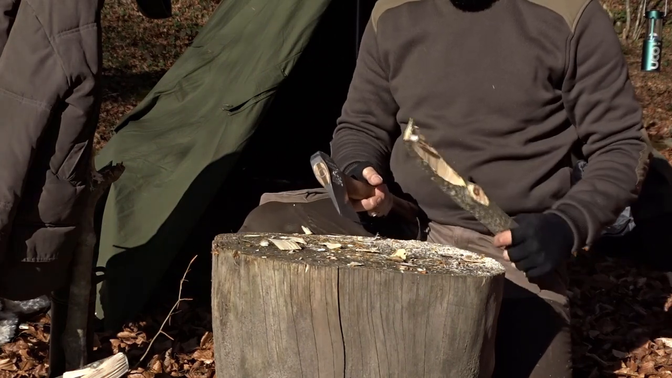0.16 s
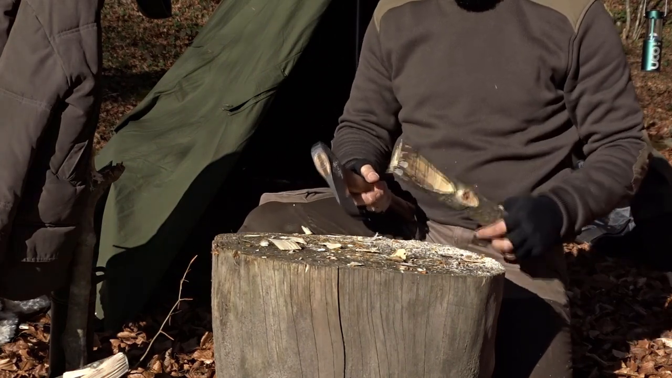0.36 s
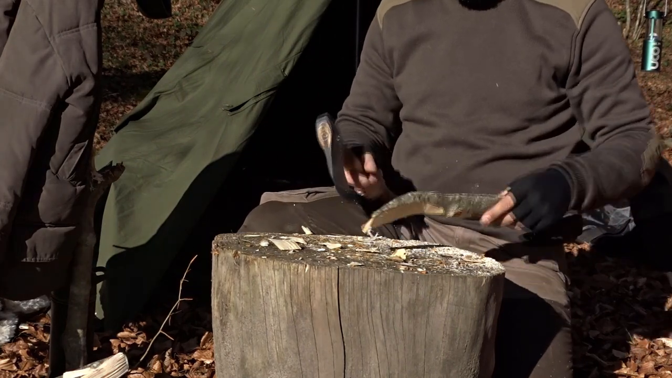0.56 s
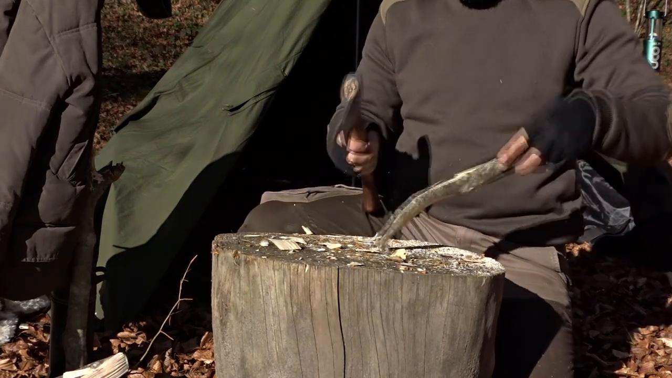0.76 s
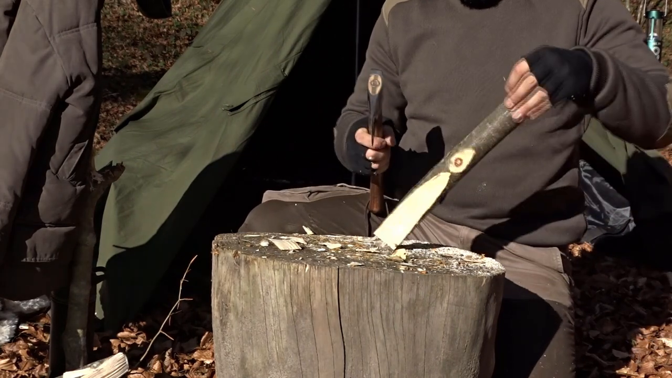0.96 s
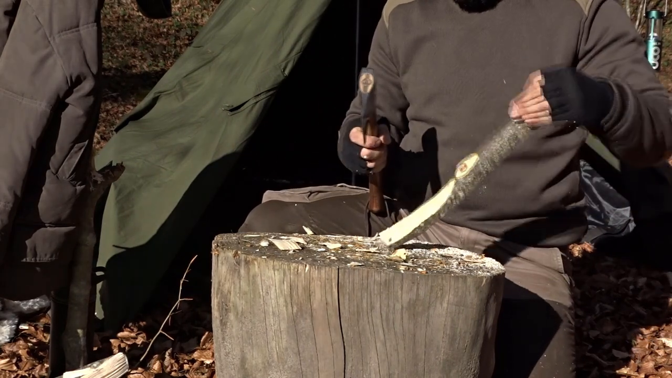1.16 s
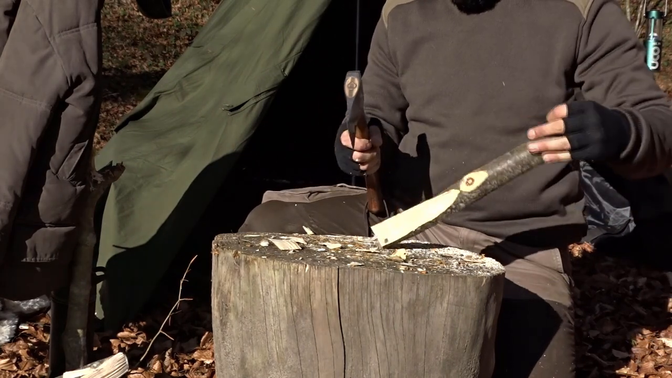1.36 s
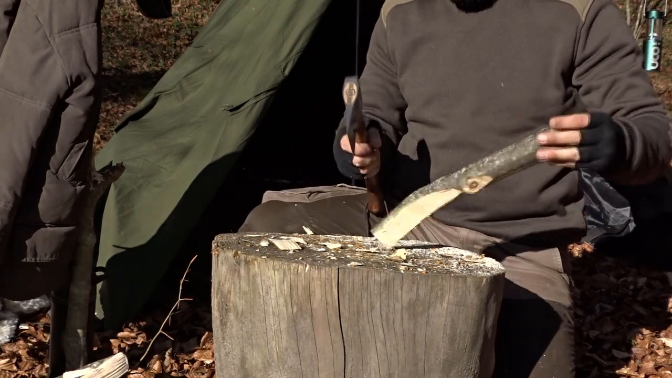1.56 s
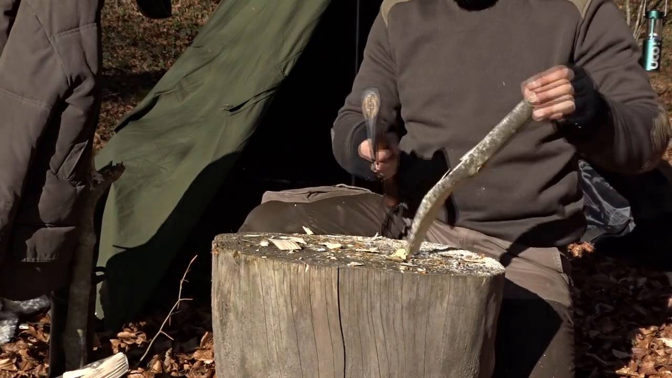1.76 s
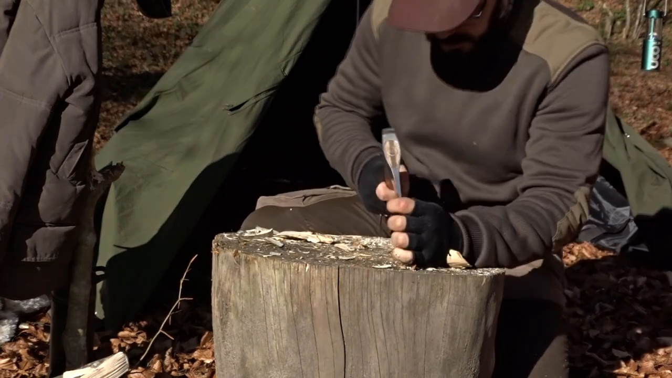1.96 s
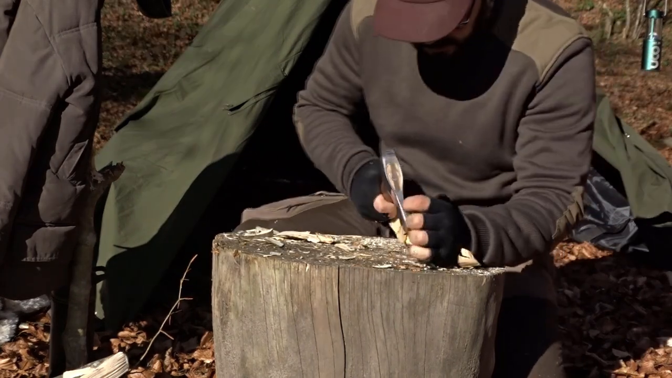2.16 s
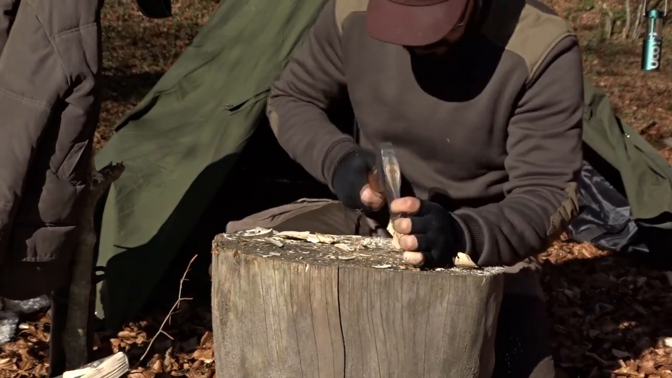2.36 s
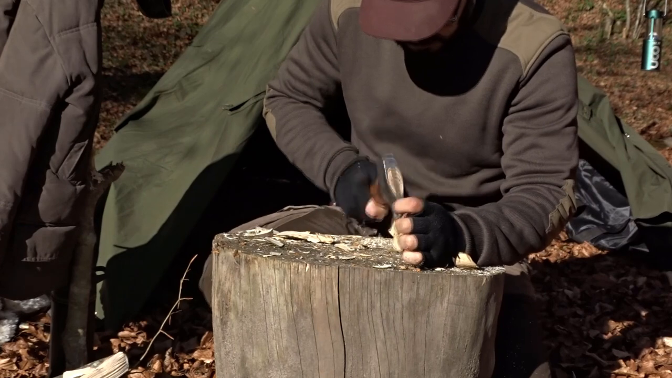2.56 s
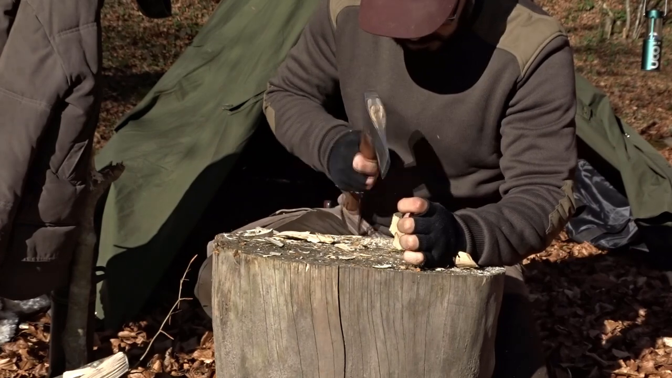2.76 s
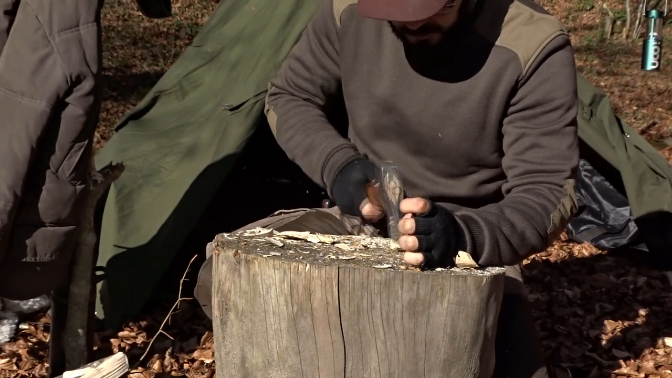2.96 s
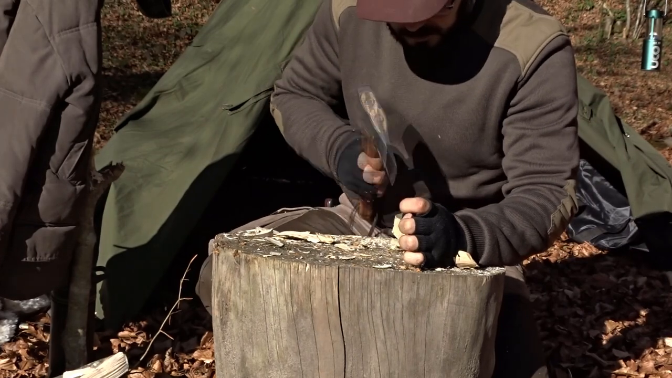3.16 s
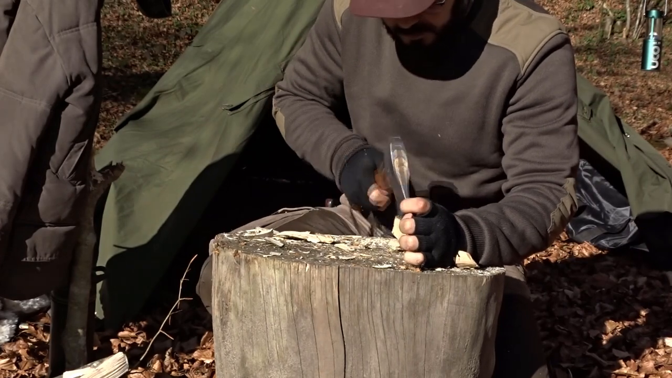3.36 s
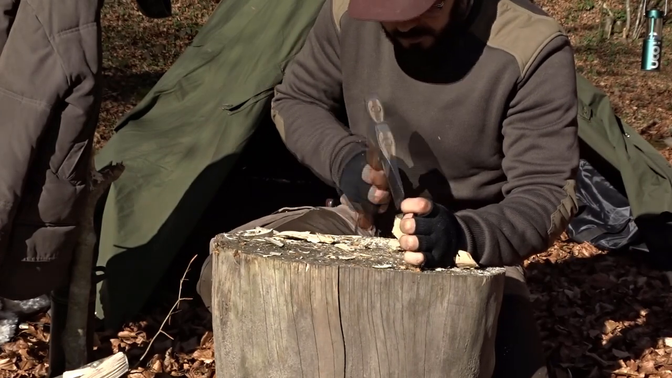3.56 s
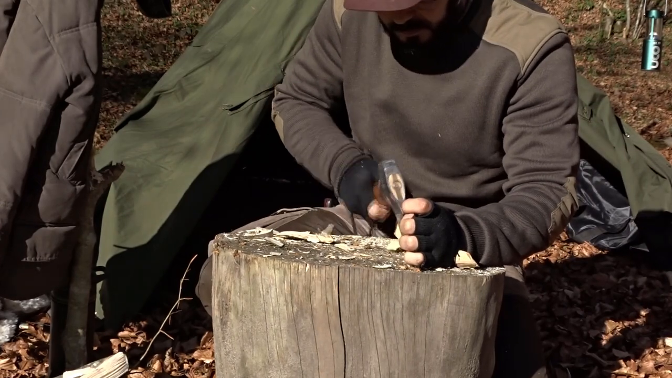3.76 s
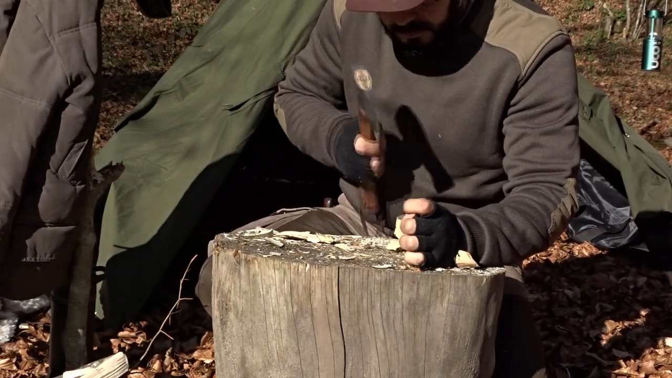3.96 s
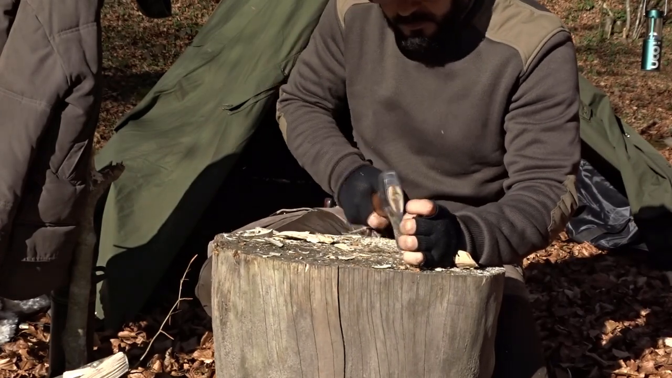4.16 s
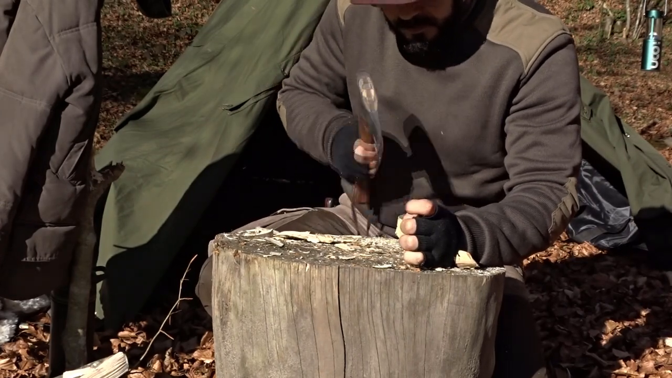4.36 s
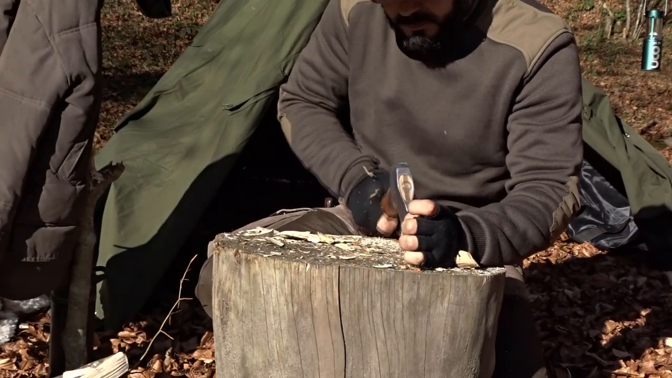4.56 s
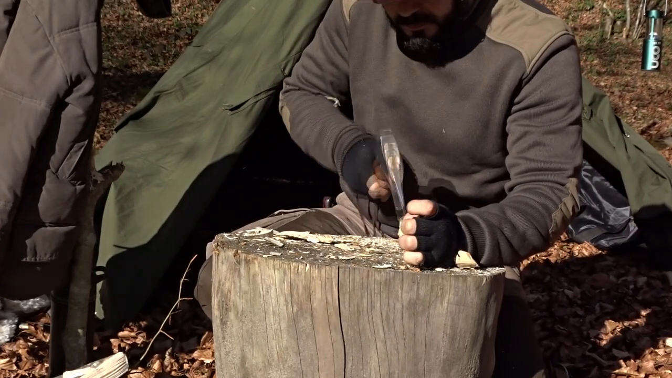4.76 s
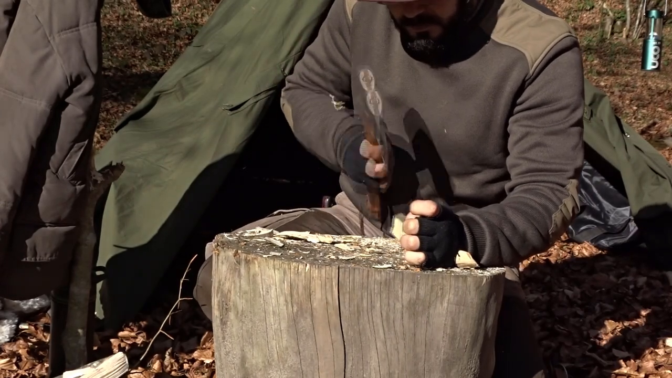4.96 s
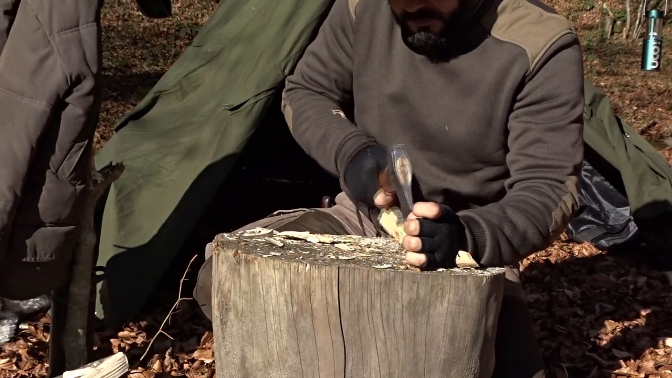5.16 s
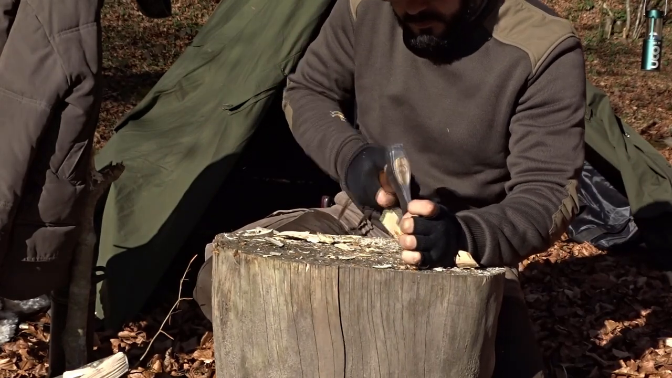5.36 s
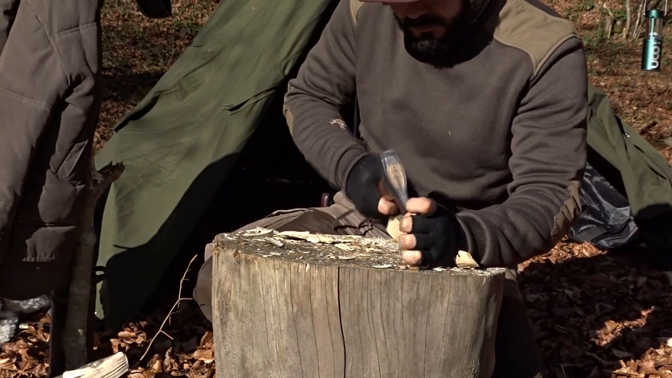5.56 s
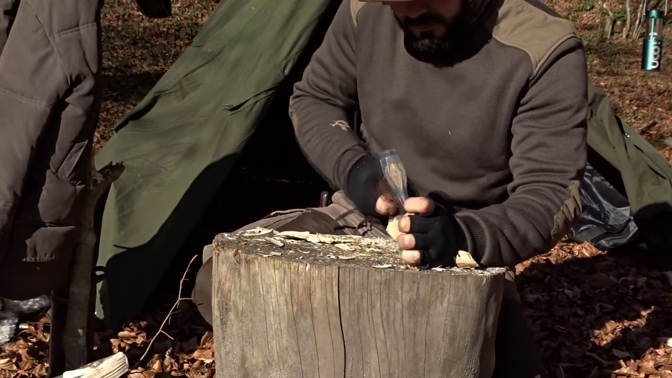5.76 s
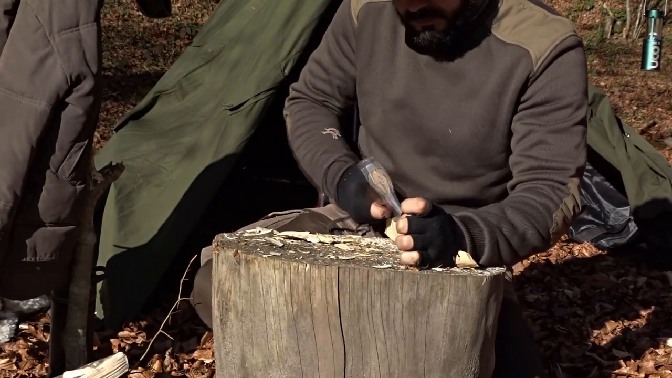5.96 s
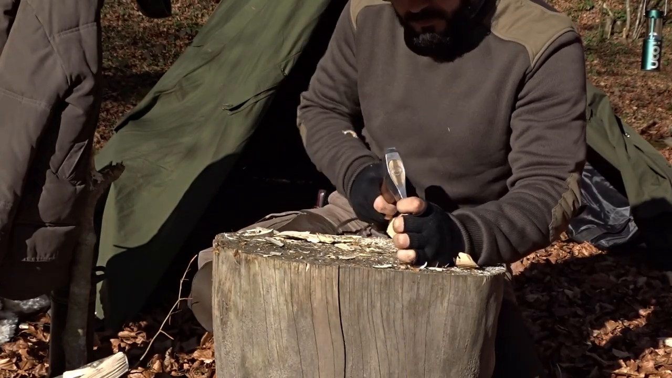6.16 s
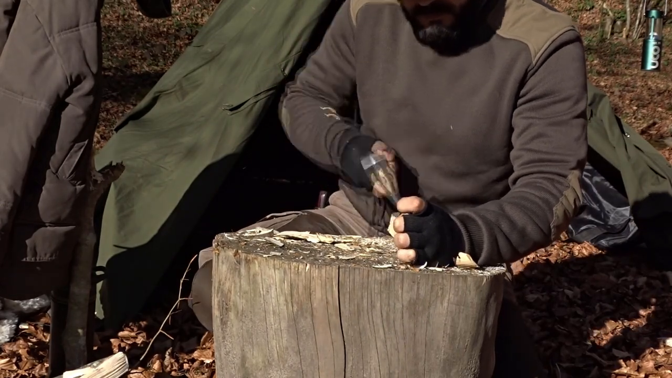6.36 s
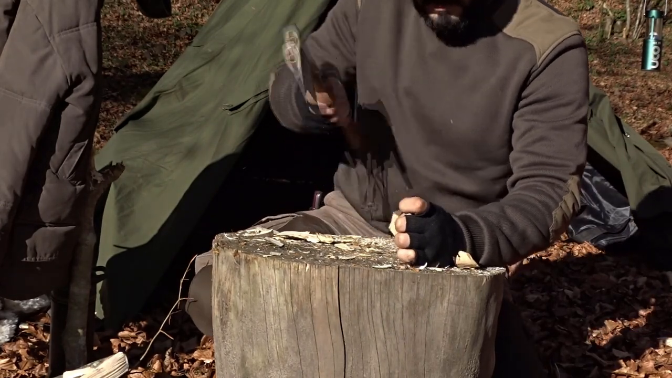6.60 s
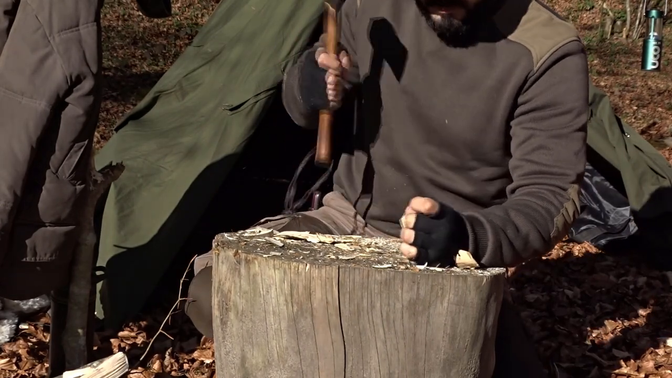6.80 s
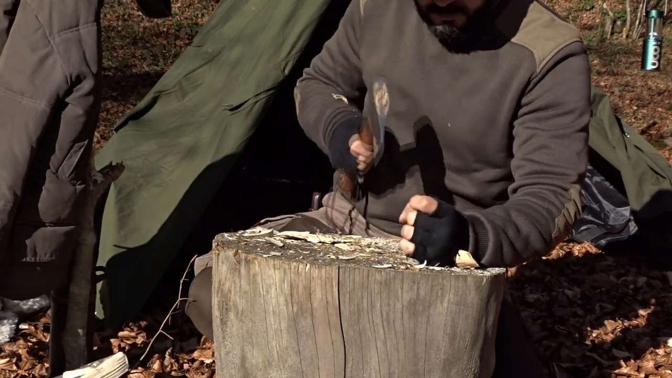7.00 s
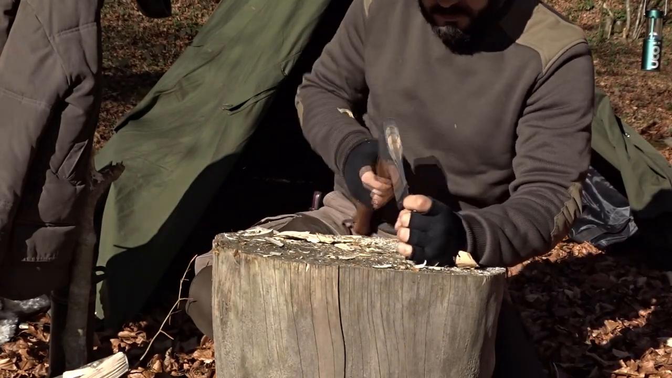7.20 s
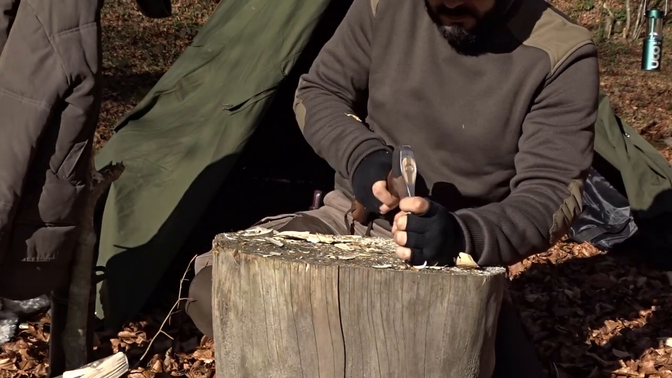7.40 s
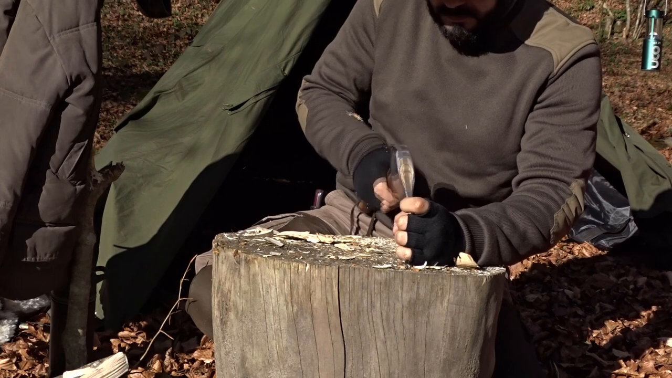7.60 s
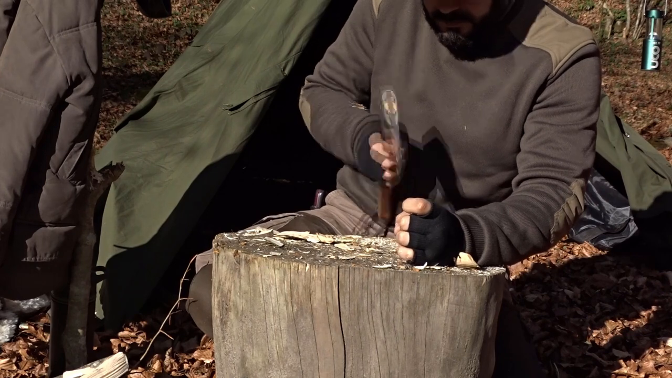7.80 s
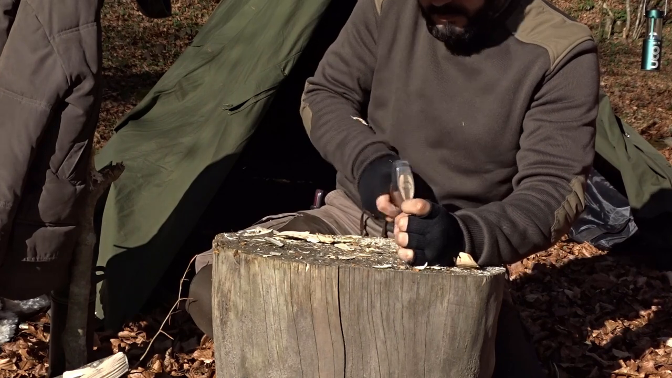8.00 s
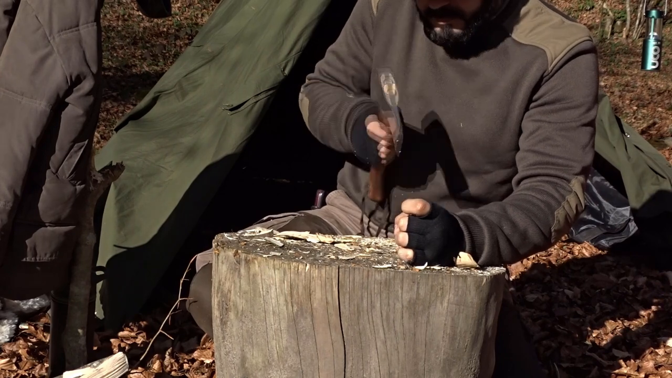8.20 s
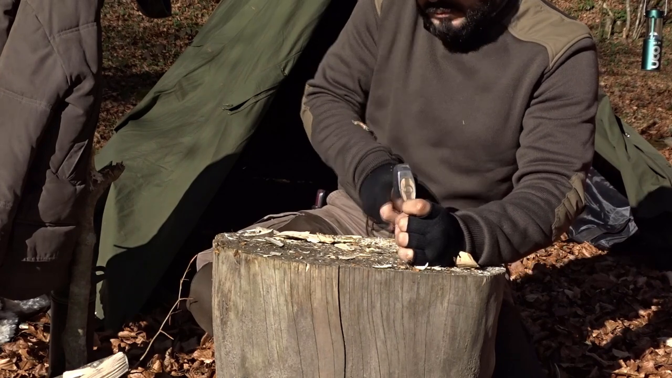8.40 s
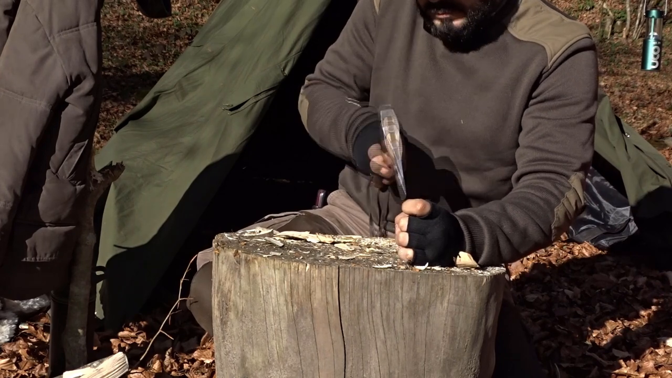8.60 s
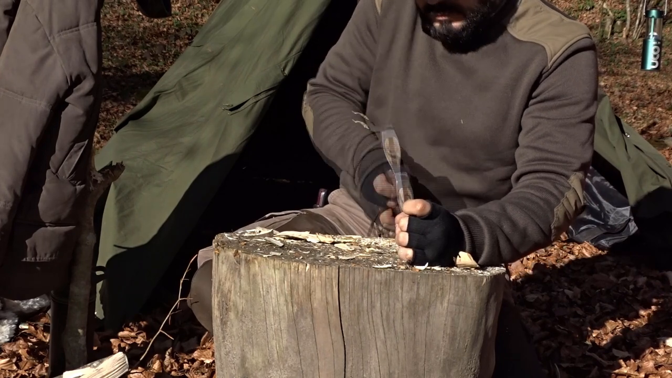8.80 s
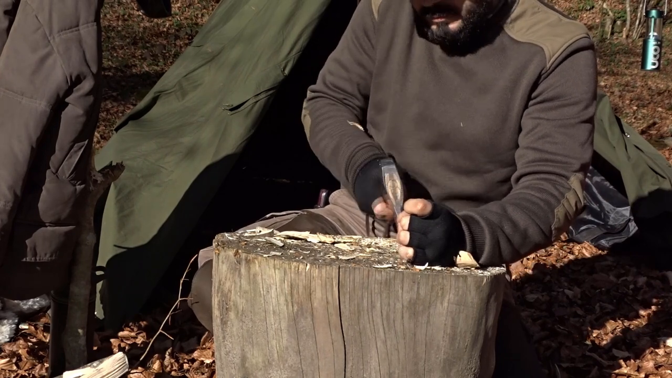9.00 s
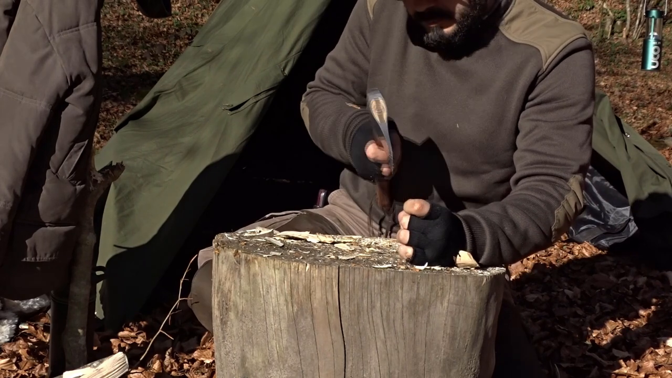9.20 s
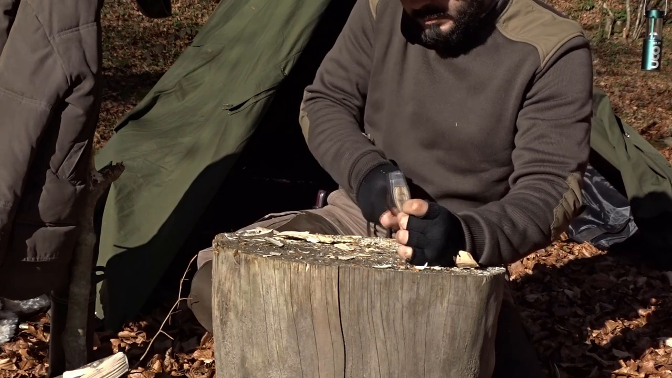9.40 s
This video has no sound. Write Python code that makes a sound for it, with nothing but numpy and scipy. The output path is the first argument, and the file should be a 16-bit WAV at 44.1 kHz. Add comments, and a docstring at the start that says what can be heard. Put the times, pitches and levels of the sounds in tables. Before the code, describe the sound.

In quiet open woodland, a hatchet chops a stick against a stump a few metres from the microphone. After leaf ticks and faint hoarse bird chatter, two weaker taps lead into five sharp, woody cracks about half a second apart. A pause brings dry rustling, then four more blows follow. Each has a short low thud, a light splinter patter and faint tree echoes over steady distant traffic.

```python
"""A hatchet chops a stick held on a tree stump in a wood, a few metres from the microphone.
Each blow is a few jolts of ringing wood, cracking noise and a steel tinge as the blade bites, splits
fibres and drives the stick onto the stump. A low ring of ground modes thuds just after, splinters patter
and the trees echo. Dry leaves tick in bursts of noise, birds call in hoarse bands and wavering sines,
a far engine drones as narrow noise and distant traffic roars steadily as shaped noise."""
import sys
import numpy as np
from scipy import signal
from scipy.fft import rfft, irfft, next_fast_len
from scipy.io import wavfile
from scipy.ndimage import uniform_filter1d

SR = 44100
rng = np.random.default_rng(int(sys.argv[2]) if len(sys.argv) > 2 else 0)


def generate_wav(signal):
    """Clip the signal to [-1, 1] and save it as 16-bit WAV at the path in sys.argv[1]."""
    frames = np.transpose(np.atleast_2d(signal))
    scaled = np.clip(frames, -1, 1) * 32767
    pcm = np.round(scaled).astype(np.int16)
    wavfile.write(sys.argv[1], SR, pcm)


N = 416744  # length in samples

# Blows of the hatchet; echo_db tells how squarely the cut faces the trees
# [start_s, thud_peak_db, splinter_db, echo_db, upper_thud_modes_db]
CHOP_BLOWS = [(2.648, -48, -63, 4, -1), (2.9598, -39, -60, 0, -8), (3.3019, -32.5, -60, 0.5, 0),
              (3.689, -33.5, -63, 0.5, -3), (4.144, -32.5, -61, 2, -4.5), (4.597, -34.5, -56, 1.5, -7),
              (5.102, -28.5, -56, -1.5, -1), (7.961, -34.5, -54.5, -1, -4), (8.4306, -38.5, -56, 5, -11),
              (8.904, -30, -60, -0.5, -2.5), (9.385, -32.5, -66, 3.5, -6)]


def undb(db):
    """Turn dB into gain."""
    return 10 ** (np.asarray(db) / 20)


def unit(x):
    """Scale to rms 1."""
    return x / np.sqrt(np.mean(x ** 2))


def band(x, lo_hz, hi_hz, order=2):
    """Band-pass, with the upper edge kept below the limit of the sample rate."""
    edges_hz = [lo_hz, min(hi_hz, 0.45 * SR)]
    return signal.sosfilt(signal.butter(order, edges_hz, "bandpass", fs=SR, output="sos"), x)


def low(x, edge_hz):
    """Low-pass."""
    return signal.sosfilt(signal.butter(2, edge_hz, fs=SR, output="sos"), x)


def add(out, start_s, x):
    """Mix x in from start_s, cut at the end of the scene."""
    i = int(start_s * SR)
    out[i:i + len(x)] += x[:N - i]


def decay(t, t60_s):
    """Exponential fade that falls 60 dB in t60_s."""
    return np.exp(-np.log(1000) * t / t60_s)


def walk(rate_hz):
    """Slow random levels: steps held for 1 / rate_hz, then slewed twice."""
    hold = int(SR / rate_hz)
    steps = np.repeat(rng.standard_normal(N // hold + 1), hold)
    return 1.05 * uniform_filter1d(uniform_filter1d(steps, hold), hold)[:N]


def near(x):
    """Small wood radiates little bass, and the microphone rolls off steeply on top."""
    x = signal.sosfilt(signal.butter(3, 237, "highpass", fs=SR, output="sos"), x)
    return signal.sosfilt(signal.butter(5, 9280, fs=SR, output="sos"), x)


def ring(force, modes, extra_db=0, scatter_db=1.0, detune=0.044):
    """A force rings a set of modes, a little differently each time; neighbours swing in opposite sense."""
    hz, db, t60_s = np.transpose(modes)[:, :, None]
    pitch_luck, level_luck = rng.standard_normal((2, len(modes), 1))
    t = np.arange(len(force)) / SR
    tones = np.sin(2 * np.pi * hz * (1 + detune * pitch_luck) * t) * decay(t, t60_s)
    sense = (-1) ** np.arange(len(modes))[:, None]
    gain = sense * undb(db + extra_db + scatter_db * level_luck)
    return signal.fftconvolve(force, np.sum(gain * tones, 0))[:len(force)]


def struck(force, modes, favoured_hz, favour_db):
    """Modes near the favoured pitch ring loudest; one an octave away changes by favour_db."""
    octaves_off = np.log2(np.array(modes)[:, :1] / favoured_hz)
    return ring(force, modes, favour_db * octaves_off ** 2, 1.0, detune=0.012)


def hatchet():
    """Each jolt is a quick push, then fibres tear while the blade stays in contact and the wood rings."""
    # Modes of the stick, the stump, the bright wooden knock and the hatchet head's steel
    # [pitch_hz, level_db, t60_s]
    stick_modes = [(618, 5.2, 0.015), (770, 7.9, 0.017), (861, 9.6, 0.014), (930, 2.74, 0.029),
                   (1063, 3.2, 0.019), (1274, 1, 0.01), (1440, 6.2, 0.015), (1750, 4, 0.017)]
    stump_modes = [(205, -14, 0.089), (281.4, -3, 0.26), (350, 0.5, 0.023), (413.6, -2, 0.065),
                   (468, 1.5, 0.034), (505, 9.5, 0.014), (586, -4, 0.035)]
    knock_modes = [(1710, 5.5, 0.0098), (2170, 6, 0.0067), (2460, 8.5, 0.0052), (2720, 4, 0.0065),
                   (3140, 1.5, 0.0034), (3600, -0.5, 0.012), (3880, 2.5, 0.0041), (4840, 5.5, 0.011),
                   (4930, 5.5, 0.0059), (6140, -2, 0.0052)]
    steel_modes = [(3220, 42, 0.015), (4600, -19, 0.078), (5840, -2, 0.074), (7360, -9, 0.032),
                   (8570, -40, 0.064)]
    # Jolts, two to four to a blow (bite, split, seat), and last a lone bounce of the stick.
    # Stump, knock and crack levels are relative to the stick; pitches are those the place struck favours;
    # grip is how soon hand and stump choke the stick once the blade stops
    # [start_s, contact_ms, stick_db, stick_hz, stump_db, knock_db, crack_db, stump_hz, knock_hz, grip_ms]
    jolts = [(2.6499, 1.6, -43, 770, 1, 9, 10, 416, 5500, 5),
             (2.6503, 4.4, -31.5, 766, 4, -4, 2, 540, 3650, 5),
             (2.6567, 3.8, -30, 730, -6, -4, -20, 340, 2670, 5),
             (2.9598, 1.7, -31, 750, -2, 1, -12, 440, 3060, 4.3),
             (2.962, 6.8, -23, 760, 0.5, -5.5, -16, 586, 2800, 5.7),
             (2.969, 4.2, -26.5, 1040, 3, -4, -6, 442, 2470, 5),
             (3.3054, 2.8, -22, 830, -2.5, -8, -8.5, 570, 4670, 4.2),
             (3.309, 4.2, -24, 1410, 2, -4, -25, 396, 2400, 5.6),
             (3.689, 2.45, -11, 828, -8.5, -6.5, -26, 540, 1800, 6),
             (3.6921, 1.6, -16, 890, -21, 1, -12.5, 520, 3000, 5.2),
             (3.6948, 1.5, -16.5, 1200, -5, -0.5, -32, 340, 1900, 3.4),
             (4.1458, 1.9, -10.5, 860, -6, 0, -22, 524, 2040, 2),
             (4.1488, 4.6, -22, 1070, -19, 0, -13, 430, 2160, 4),
             (4.1524, 2.3, -18.5, 1010, 8.5, -24, -30, 505, 2200, 3.5),
             (4.599, 3.4, -17.5, 792, -8, -5.5, -20, 483, 2360, 4.8),
             (4.6016, 2.8, -14.5, 1140, -24, -1.5, -23, 393, 2700, 2.6),
             (4.6047, 2.3, -11.5, 1440, -20, -10.5, -16, 480, 4370, 4.5),
             (4.6074, 3, -25, 830, 8.5, -10, -22, 503, 3000, 3.2),
             (5.1055, 2, -18.5, 774, -2, -1.5, -9, 490, 2500, 2.5),
             (5.1071, 2.3, -22, 796, -5, 4, -3.5, 580, 2600, 4.2),
             (5.1089, 1.8, -14, 760, -5.5, -9, -13, 323, 2600, 3),
             (5.113, 3.2, -27, 620, 1, -18, -20, 390, 2500, 5),
             (7.9605, 3.5, -12.5, 1090, -6.5, -10, -27, 513, 2980, 3.9),
             (7.9661, 3.3, -13.5, 1770, -35, -3.5, -12, 470, 3230, 5),
             (7.97, 3.3, -23, 1700, -0.5, -10, -17, 370, 1750, 4.4),
             (8.4313, 2.6, -14.5, 815, -10, 6, -40, 520, 1940, 2.7),
             (8.4334, 4, -16, 1460, -24, -5, -14.5, 474, 2550, 6.6),
             (8.4386, 3.6, -33, 850, 2, 3.5, -17, 350, 3600, 4.3),
             (8.9089, 5, -24.5, 1760, 2, 2.5, -8, 483, 2760, 5),
             (8.9128, 3.7, -10, 1050, 2, -9, -46, 480, 2020, 7.8),
             (9.3849, 1.8, -22, 846, -2, -4.5, -20.5, 312, 2680, 5),
             (9.3862, 1.9, -13.5, 1020, -3.5, -17, -47, 444, 2800, 15),
             (9.389, 1.37, -20, 880, 14.5, -17, -46, 430, 2420, 5.3),
             (2.991, 4.6, -42, 750, 9, -11, -27, 436, 2500, 5)]
    push_s, tear_share, steel_db = 0.000077, 0.03, -9.5
    stump_damp_s = 0.0029  # the stump's face is damped by the stick pressed onto it
    ceiling = 0.95

    out, t = np.zeros(N), np.arange(int(0.12 * SR)) / SR
    push = np.sin(np.pi * np.clip(t / push_s, 0, 1))
    for (start_s, contact_ms, stick_db, stick_hz, stump_db, knock_db, crack_db,
         stump_hz, knock_hz, grip_ms) in jolts:
        contact_s = contact_ms / 1000
        contact = np.exp(-(t / contact_s) ** 1.23) + 0.17 * np.exp(-t / 0.0068)
        tear = contact * rng.standard_normal(len(t)) * undb(0.33 * rng.standard_normal(len(t)))
        force = tear_share * tear + push
        tick = 0.17 * tear + (t == 0)

        crack = unit(band(tick + 1.4 * tear, 4900, 10300, order=3))
        crack = crack + undb(steel_db) * unit(ring(tick, steel_modes))

        after_s = np.maximum(t - contact_s, 0)
        choke = np.exp(-after_s / (grip_ms / 1000))
        damp = np.exp(-after_s / stump_damp_s)
        stick = choke * struck(force, stick_modes, stick_hz, -45)
        stump = damp * struck(force, stump_modes, stump_hz, -25)
        knock = choke * struck(tick, knock_modes, knock_hz, -22)

        for part, rel_db in ((stick, 0), (stump, stump_db), (knock, knock_db), (crack, crack_db)):
            contact_rms = np.sqrt(np.mean(part[:int(contact_s * SR)] ** 2))
            add(out, start_s, undb(stick_db + rel_db) * part / contact_rms)
    return near(ceiling * np.tanh(out / ceiling))  # the loudest peaks are softly rounded


def thuds():
    """The stump shakes the soil, whose slow waves swell in late and linger; splinters patter down."""
    # Modes of the ground [pitch_hz, level_db, t60_s]
    ground_modes = [(73.2, -2, 0.38), (146.4, 2, 0.25), (183, -7, 0.15), (250, 2, 0.088), (319, 2, 0.075)]
    rise_s, lag_s, hold_s = 0.0092, 0.02, 0.12

    out, t = np.zeros(N), np.arange(int(0.4 * SR)) / SR
    impulse = 1. * (t == 0)
    is_upper = np.arange(len(ground_modes))[:, None] > 0
    envelope = (1 - np.exp(-(t / rise_s) ** 2)) * np.exp(-(t / hold_s) ** 3)
    for start_s, thud_db, splinter_db, _, upper_db in CHOP_BLOWS:
        wave = envelope * ring(impulse, ground_modes, upper_db * is_upper, 1, 0.015)
        # a few grains stand far above the rest
        grains = rng.standard_normal(len(t)) * undb(2.2 * rng.exponential(size=len(t)))
        patter = unit(band(grains, 3000, 7900, order=3)) * np.exp(-t / 0.078)
        add(out, start_s + lag_s, undb(thud_db) * wave / np.max(abs(wave)))
        add(out, start_s + 0.012, undb(splinter_db) * patter)
    return out


def surroundings(x):
    """A few smeared echoes and a thin scatter from the trunks, which stand some metres off."""
    # Echoes from things nearby [delay_s, level_db, low_edge_hz, high_edge_hz]
    echoes = [(.013, -18.5, 250, 686), (0.021, -25, 200, 505), (0.0354, -26.5, 1350, 2050),
              (0.047, -38, 596, 1200), (0.041, -37, 1500, 4570), (0.052, -43, 1200, 2300),
              (0.077, -37, 1300, 2100)]
    wood_db, wood_t60_s, wood_lo_hz, wood_hi_hz = -26, 0.53, 310, 6600

    t = np.arange(int(0.5 * SR)) / SR
    scatter = unit(band(rng.standard_normal(len(t)), wood_lo_hz, wood_hi_hz, order=1))
    onset = np.clip((t - 0.03) / 0.0035, 0.55, 1)  # thinner for the first 32 ms
    reply = undb(wood_db) * scatter * decay(t, wood_t60_s) * onset / np.sqrt(0.06 * SR)
    for delay_s, db, lo_hz, hi_hz in echoes:
        click = 1. * (np.arange(len(t)) == int(delay_s * SR))
        reply += undb(db) * band(click, lo_hz, hi_hz)
    start_s, _, _, echo_db, _ = np.transpose(CHOP_BLOWS)
    facing = undb(np.interp(np.arange(N) / SR, start_s, echo_db))
    return signal.fftconvolve(x * facing, reply)[:N]


def leaves():
    """Dry leaves and twigs tick in short noise bursts; the longer scuffs swell in more softly."""
    # Ticks and scuffs, levels ahead of their envelope [start_s, level_db, centre_hz, t60_s]
    leaf_ticks = [(.345, -54, 7460, .04), (0.362, -40.5, 6600, 0.016), (0.363, -46, 3600, 0.016),
                  (.871, -54, 8800, .014), (2.55, -53, 8600, .015), (.475, -50, 6800, 0.17),
                  (.824, -56, 8500, .07), (2.345, -49, 8000, 0.027), (3.429, -49, 6500, 0.023),
                  (4.53, -45, 8000, 0.014), (6.425, -49, 6200, 0.13), (6.453, -45, 2600, .015),
                  (6.45, -46, 6100, .015), (6.22, -56, 8500, .02), (6.29, -56, 8500, .012),
                  (6.335, -61, 8500, .04), (6.499, -55, 8000, .012), (6.726, -54, 7500, .015),
                  (6.595, -50, 5000, 0.087), (6.62, -47, 5500, 0.014), (6.675, -50, 5600, 0.17),
                  (7.559, -47, 5500, .02), (7.588, -40, 4200, 0.01)]

    out, t = np.zeros(N), np.arange(int(0.1 * SR)) / SR
    for start_s, db, hz, t60_s in leaf_ticks:
        rustle = unit(band(rng.standard_normal(len(t)), hz / 1.53, hz * 1.16))
        swell = np.minimum(t / t60_s ** 2, 1)  # swell time in s is t60 squared
        add(out, start_s, undb(db) * rustle * decay(t, t60_s) * swell)
    return out


def birds():
    """Hoarse notes are narrow noisy bands that sag; whistles are wavering sines; the trees smear both."""
    # Hoarse chattered notes [start_s, level_db, pitch_hz, length_s]
    chatter_notes = [(1.64, -63, 4620, 0.065), (1.729, -63, 4600, .09), (1.85, -61, 4580, 0.077),
                     (1.995, -64, 4620, .09), (2.133, -62.5, 4720, 0.091), (2.288, -63, 4570, 0.072),
                     (2.419, -60.5, 4770, 0.074), (2.52, -69, 4600, 0.046)]
    # Partials of each hoarse note [pitch_multiple, level_db, hoarseness_hz]
    chatter_partials = [(1.001, 5, 230), (.87, -3, 200), (1.349, 2, 500), (1.62, -2, 600), (2.9, -19, 900)]
    # Thin whistles, each a list of breakpoints [time_s, pitch_hz, level_db]
    whistle_glides = [
        [(1.66, 8000, -71), (1.69, 8630, -64), (1.755, 8550, -82)],
        [(7.475, 8350, -72), (7.57, 8000, -78)],
        [(8.755, 6360, -72), (8.785, 7600, -66), (8.81, 7500, -57), (8.83, 7160, -65), (8.85, 7500, -62),
         (8.86, 7140, -58), (8.885, 7860, -65), (8.925, 6860, -71), (8.975, 6450, -64)],
        [(8.99, 6600, -72), (9.005, 6950, -64), (9.025, 7440, -67), (9.09, 7530, -76)],
    ]

    out = np.zeros(N)
    for start_s, db, hz, length_s in chatter_notes:
        t = np.arange(int(length_s * SR)) / SR
        sag = 1 - 0.056 * t / length_s
        envelope = np.sin(np.pi * t / length_s) ** 0.6
        for multiple, part_db, hoarse_hz in chatter_partials:
            rasp = unit(low(rng.standard_normal(len(t)), hoarse_hz))
            phase = 2 * np.pi * np.cumsum(multiple * hz * sag) / SR
            gain = undb(db + part_db + rng.standard_normal())
            add(out, start_s, gain * rasp * np.sin(phase) * envelope)

    for points in whistle_glides:
        time_s, hz, db = np.transpose(points)
        t = np.arange(time_s[0], time_s[-1], 1 / SR)
        pitch_waver, level_waver = unit(low(rng.standard_normal((2, len(t))), 150))
        phase = 2 * np.pi * np.cumsum(np.interp(t, time_s, hz) * (1 + 0.0032 * pitch_waver)) / SR
        fade = np.clip(np.minimum(t - time_s[0], time_s[-1] - t) / 0.0088, 0, 1)
        level = undb(np.interp(t, time_s, db) + 4.7 * level_waver)
        add(out, time_s[0], np.sqrt(2) * fade * level * np.sin(phase))

    t = np.arange(int(0.3 * SR)) / SR
    tail = rng.standard_normal(len(t)) * np.exp(-t / 0.08)
    smear = signal.fftconvolve(out, tail / np.sqrt(np.sum(tail ** 2)))[:N]
    return out + undb(-4) * smear


def drone():
    """A far engine is a narrow low rumble of noise that swells and fades."""
    # Swells of the engine [time_s, level_db]
    engine_swells = [(0, -72), (1.5, -59), (2.1, -57.5), (2.7, -59), (3.4, -70), (4.5, -62), (5.2, -60.5),
                     (6, -62), (7, -59), (8.5, -67), (9.45, -59)]
    centre_hz, width_hz = 94, 50

    time_s, db = np.transpose(engine_swells)
    hum = band(rng.standard_normal(N), centre_hz - width_hz / 2, centre_hz + width_hz / 2)
    return unit(hum) * undb(np.interp(np.arange(N) / SR, time_s, db))


def coloured(spectrum, flicker_db):
    """Noise with the given spectrum, at rms 1; each octave flickers a little on its own."""
    n = next_fast_len(N)
    hz = np.maximum(np.fft.rfftfreq(n, 1 / SR), 1)
    point_hz, point_db = np.transpose(spectrum)
    shape = undb(np.interp(np.log(hz), np.log(point_hz), point_db))
    bins = rfft(rng.standard_normal(n)) * shape
    octave = np.log2(hz / 30)
    out = np.zeros(N)
    for k in range(-1, 11):
        share = np.clip(1 - abs(octave - k), 0, 1)  # neighbouring octaves crossfade
        out += irfft(bins * share, n)[:N] * undb(flicker_db * walk(3.29))
    return unit(out)


def traffic():
    """Distant traffic is steady shaped noise whose level drifts very slightly."""
    # Spectrum of the roar, relative levels per Hz [frequency_hz, level_db]
    roar_spectrum = [(15, -46), (25, -6.5), (66, -3.5), (113, -3.5), (135, -11), (166, -3.5), (257, -9.5),
                     (341, -6), (407, -9), (440, -6), (1260, -6.5), (1750, -12.5), (2930, -14), (6470, -26),
                     (11400, -44.5), (13500, -56), (15000, -72), (22000, -120)]
    return undb(-47 + 0.038 * walk(0.85)) * coloured(roar_spectrum, 1.0)


def wide_roar():
    """Shaped noise for the side channel spreads the roar between left and right."""
    # Spectrum of the wide roar, relative levels per Hz [frequency_hz, level_db]
    wide_spectrum = [(15, -52), (25, -4), (108, -9.5), (171, -14), (451, -20.5), (856, -26.5), (998, -34),
                     (3590, -25), (11400, -38.5), (14800, -69), (22000, -120)]
    return undb(-66) * coloured(wide_spectrum, 0.42)


def scene():
    """The chopping is dead centre; birds, engine and the deepest roar lean to one side."""
    chop, song, engine, roar = hatchet(), birds(), drone(), traffic()
    mid = chop + thuds() + surroundings(chop) + near(leaves()) + song + engine + roar
    # in phase with the mid leans left, out of phase leans right
    side = undb(-11) * song + undb(-6) * engine + undb(-24) * low(roar, 120)
    side += wide_roar()
    return np.array([mid + side, mid - side])


def record(dry):
    """The recorder adds a faint high hiss, unrelated left and right, and cuts the top."""
    hiss_db, hiss_hz, top_hz = -93, 11500, 15700
    hiss = undb(hiss_db) * unit(band(rng.standard_normal(dry.shape), hiss_hz, 2.3 * hiss_hz))
    return signal.sosfilt(signal.ellip(8, 0.2, 70, top_hz, fs=SR, output="sos"), dry + hiss)


dry = scene()
out = record(dry)
generate_wav(out)
```